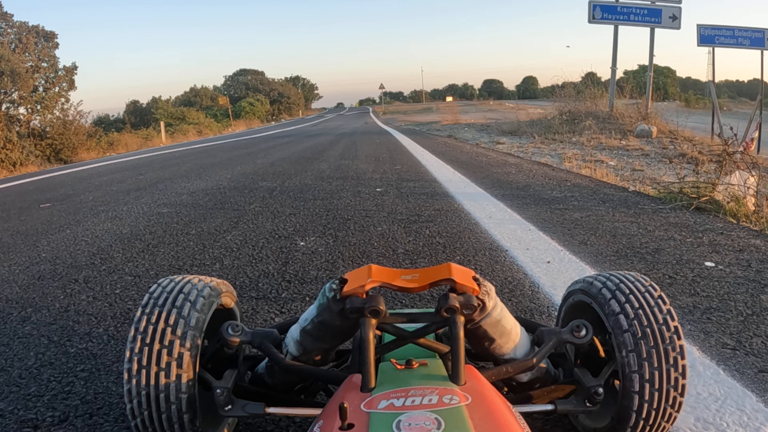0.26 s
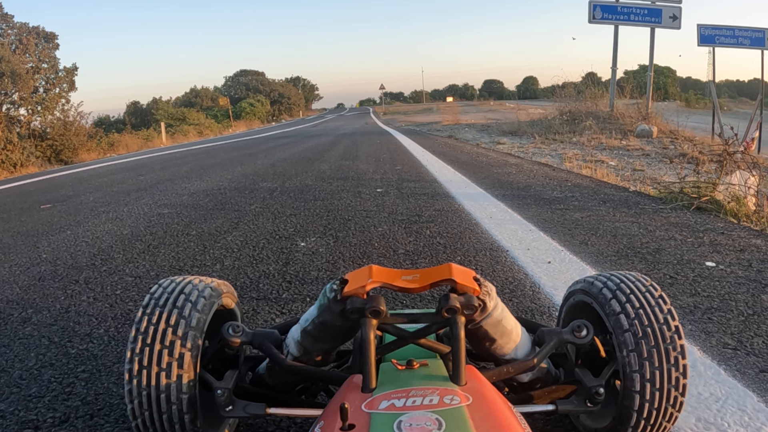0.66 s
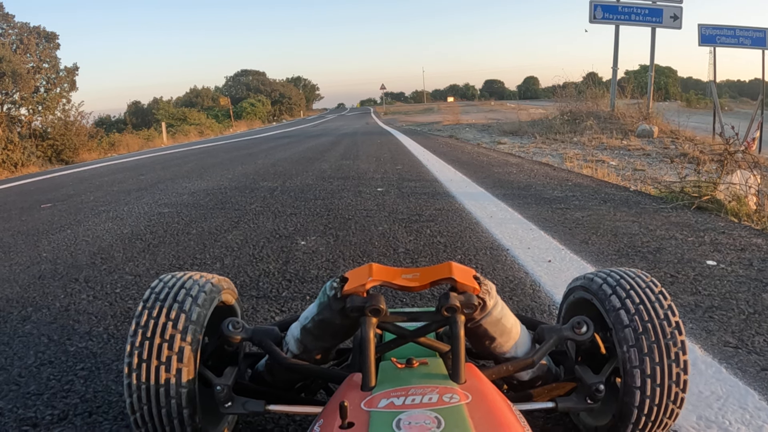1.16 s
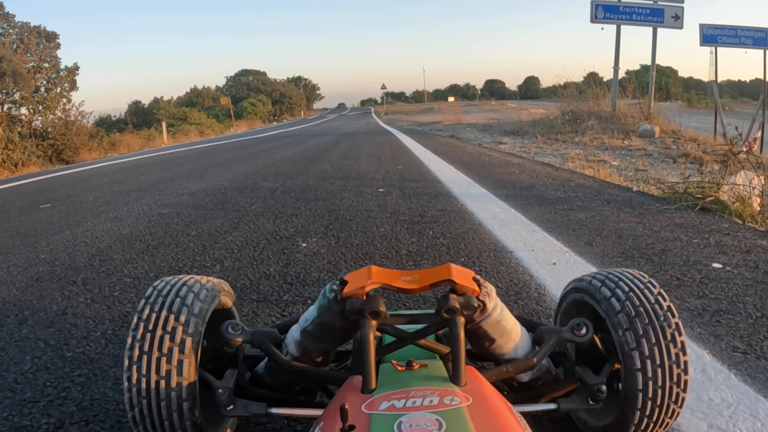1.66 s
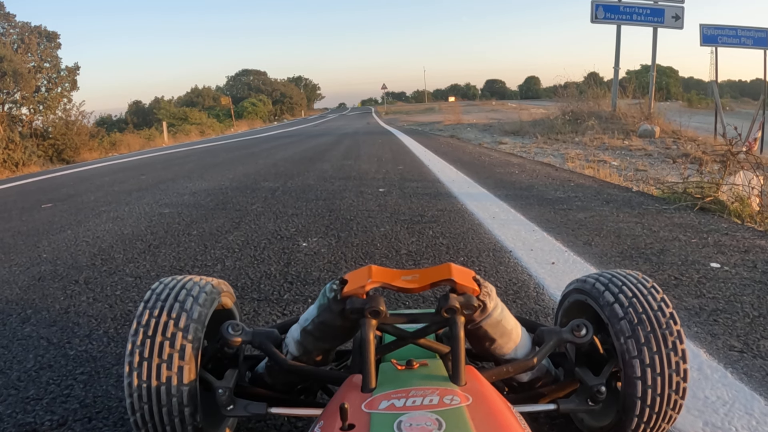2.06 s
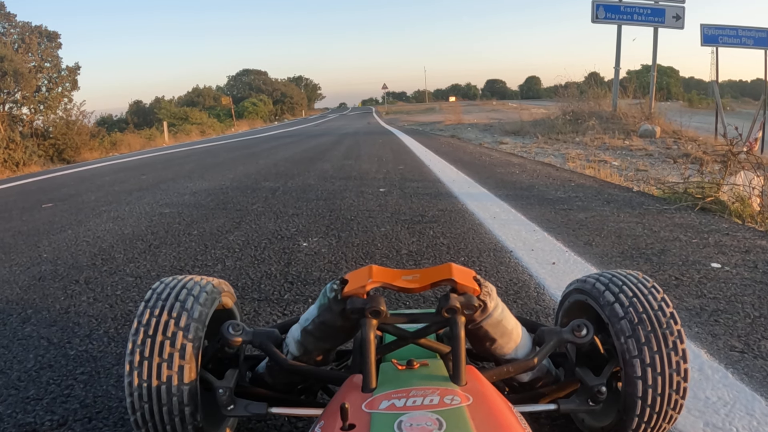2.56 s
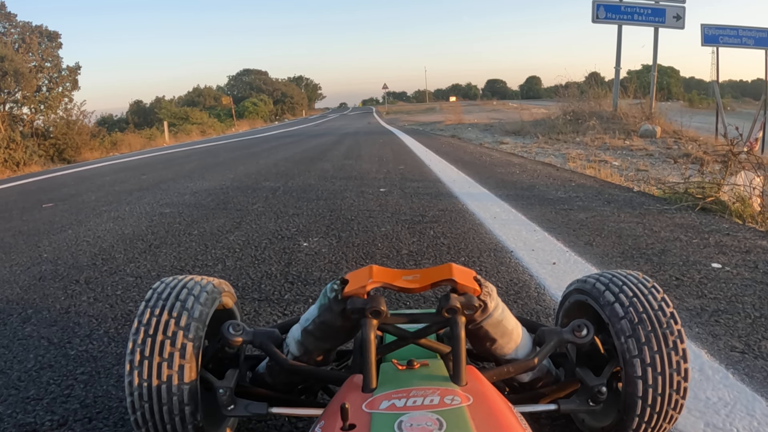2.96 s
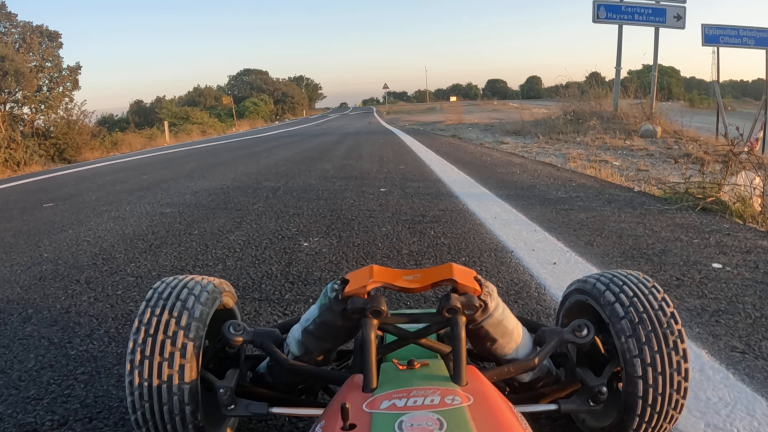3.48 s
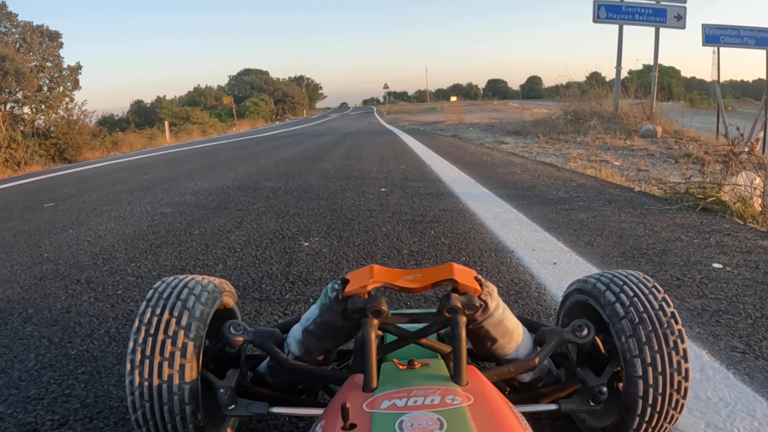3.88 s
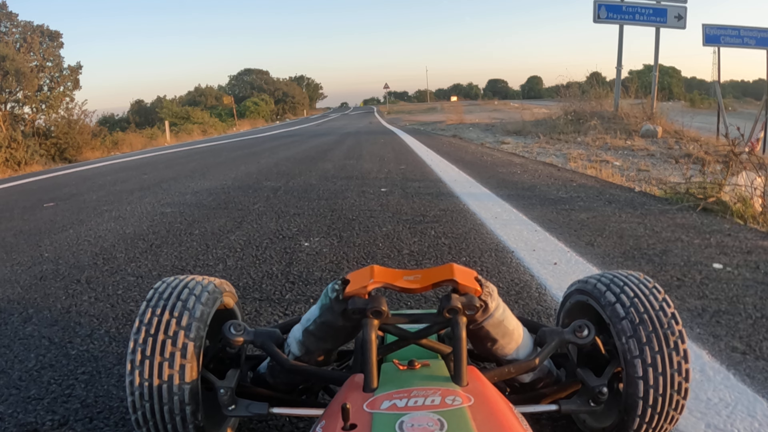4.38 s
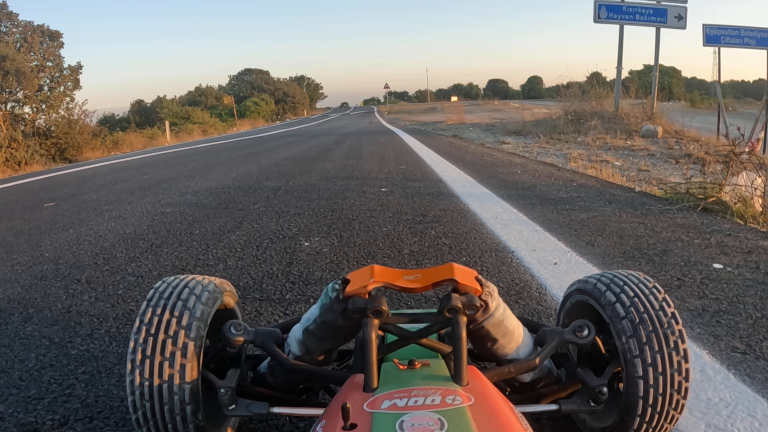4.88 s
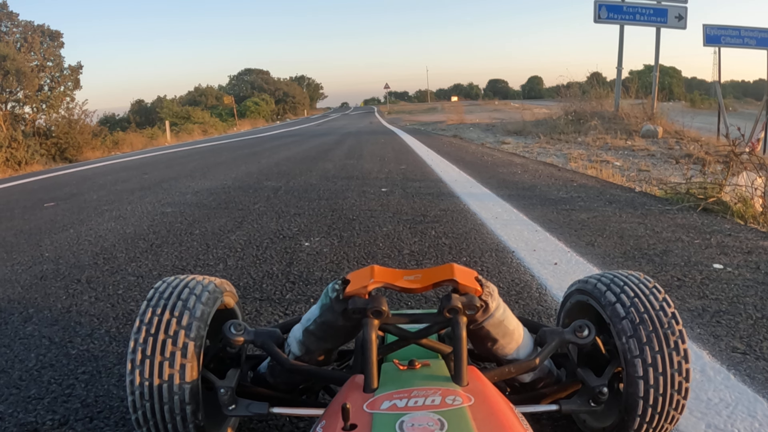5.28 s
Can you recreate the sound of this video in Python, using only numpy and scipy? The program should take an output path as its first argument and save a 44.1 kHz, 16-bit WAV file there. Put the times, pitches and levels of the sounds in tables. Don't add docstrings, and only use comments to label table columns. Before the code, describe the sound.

Close, body-mounted view of a small buggy starting outdoors: light irregular starter clicking, a few lurching thumps, then violent knocks and exhaust snaps as the engine catches. The pitch rises over about a second and a half into a low, lumpy putter with drumming panels and metallic chatter. A short rev jumps up and falls back, and another begins at the cut. No echo.

```python
import sys
import numpy as np
from scipy import signal
from scipy.fft import rfft, irfft, next_fast_len
from scipy.io import wavfile
from scipy.ndimage import uniform_filter1d, minimum_filter1d, map_coordinates

SR = 44100
rng = np.random.default_rng(int(sys.argv[2]) if len(sys.argv) > 2 else 0)


def generate_wav(sig):
    pcm = np.round(np.clip(np.atleast_2d(sig).T, -1, 1) * 32767).astype(np.int16)
    wavfile.write(sys.argv[1], SR, pcm)


def elevation(decibels):
    levels = np.asarray(decibels, float)
    return 10 ** (levels / 20)


N = 243917

# (t/s, speed/Hz, effort/dB)
SHAFT = [(1.45, 41.5, -2.5), (1.57, 44.5, -2.5), (1.77, 50.96, 4.5), (2.1, 55.18, 1), (2.99, 64.63, 2),
         (3.22, 66.87, 1.5), (3.979, 67.95, 4.5), (4.109, 66.5, 4), (4.33, 67.93, 3), (4.42, 78.28, 1.5),
         (4.531, 80.44, 1), (4.749, 70.7, 3), (4.951, 67.34, 2.5), (5.059, 66.55, 2), (5.278, 66.9, 3.5),
         (5.348, 67.63, 4), (5.44, 73.9, 3.5), (5.53, 80.8, 3.5)]
# (t/s, effort/dB, throttle 0-1)
CATCH = [
    (1.15, -50, .4),
    (1.215, -33.5, 0.2),
    (1.264, -20.5, 0),
    (1.308, -2, 0),
    (1.35, 0, 0.1),
    (1.414, 4, 0.3),
    (1.49, -9.5, 0.15),
    (1.54, -0.5, 0.3),
    (1.65, -4, 0.5),
    (1.71, -9.5, 0.62),
]
# (f/Hz, level/dB per Hz)
PANEL = [(10, -9.5), (30, -11.5), (60, -4.5), (120, -2.5), (200, -3), (300, -2.5), (530, -3.5), (620, -6.5),
         (730, -14), (900, -20.5), (1500, -48.5), (4000, -120)]
# (f/Hz, level/dB per Hz)
CHATTER = [(1180, -25.5), (2000, -3.5), (2530, -1), (3130, -6), (3500, -12.5), (3990, -13), (4340, -21.5),
           (5640, -34), (9550, -120)]
# (f/Hz, level/dB per Hz)
PUFF = [(3500, -39), (4600, -11), (5500, 0), (6500, -9), (7500, -11), (8300, -16.5), (10000, -26),
        (11000, -42.5), (14000, -68.5)]


def unit(x):
    return x / np.sqrt(np.mean(x ** 2) + 1e-20)


def curves(rows):
    s, *cols = np.transpose(rows)
    return [np.interp(np.arange(N) / SR, s, c) for c in cols]


def sounding(rows, fade_s=0.026):
    start, end = rows[0][0], rows[-1][0]
    return np.interp(np.arange(N) / SR, [start - fade_s, start, end, end + fade_s], [0, 1, 1, 0])


def wobble(rate_hz):
    return map_coordinates(rng.standard_normal(int(N * rate_hz / SR) + 4), [np.arange(N) * rate_hz / SR])


def coloured(x, spectrum):
    m = next_fast_len(N + SR // 2) * 2
    f, db = np.transpose(spectrum)
    gain = elevation(np.interp(np.log(np.fft.rfftfreq(m, 1 / SR) + 1), np.log(f), db))
    cep = irfft(np.log(gain + 1e-7), m)
    cep[1:m // 2] *= 2
    cep[m // 2 + 1:] = 0
    return unit(irfft(rfft(x, m) * np.exp(rfft(cep)), m)[:N])


def knocks(density_hz, spread_db, hiss):
    hit = rng.random(N) < density_hz / SR
    impacts = hit * rng.standard_normal(N) * elevation(spread_db * rng.standard_normal(N))
    return unit(impacts) + hiss * rng.standard_normal(N)


def mount(x):
    dead_hz, dead_width_hz = 1490, 260
    return signal.lfilter(*signal.iirnotch(dead_hz, dead_hz / dead_width_hz, SR), x)


def road():
    # (f/Hz, level/dB per Hz)
    air = [(15, -21.5), (25, -4.5), (100, -8), (300, -8), (500, -9), (664, -24), (880, -3), (1000, -3.5),
           (1150, -9), (1800, -25), (2800, -33.5), (3500, -30), (3800, -42.5), (4500, -39.5), (8000, -56),
           (11000, -120)]
    level_db = -49.5
    return elevation(level_db + 2.7 * wobble(22)) * coloured(rng.standard_normal(N), air)


def starter():
    # (t/s, peak/dB)
    teeth = [(0.016, -39.5), (.047, -47), (.086, -41), (0.167, -27), (0.174, -29), (0.186, -32),
             (.238, -45), (0.278, -30), (.308, -48), (0.331, -30), (0.363, -30), (0.38, -27.5),
             (0.407, -30), (0.455, -29.5), (0.524, -28), (0.551, -29), (0.569, -26.5), (0.582, -31),
             (.608, -28), (.645, -30), (0.667, -32.5), (0.722, -40), (0.734, -30), (0.745, -29.5),
             (0.771, -26), (.804, -28), (.952, -38.5), (0.99, -26), (1.008, -30), (1.061, -42),
             (1.137, -26.5)]
    # (t/s, peak/dB, metal edge/dB)
    blows = [(0.687, -17.5, -30), (0.835, -26, -34), (0.844, -18.5, -44), (0.856, -19, -45),
             (0.863, -44, -32.5), (0.912, -28.5, -32), (1.167, -32, -23), (1.179, -27, -22),
             (1.241, -16, -26), (1.273, -17, -28), (1.288, -6.5, -42), (1.2995, -9, -33), (1.307, -5, -41),
             (1.33, -9.5, -33), (1.3801, -10.5, -24), (1.446, -18, -22), (1.5, -14, -22), (3.695, -15, -31)]
    # (f/Hz, level/dB, share of ring length)
    plastic = [(677, -14, 1.9), (845, -9, 0.91), (1041, -4.5, .6), (1132, 4.5, 0.72), (1233, 3, 0.72),
               (1308, -1, 0.67), (1746, -19.5, 0.59)]
    # (f/Hz, level/dB, share of ring length)
    metal = [(2140, -5, .7), (2510, -8, 0.7), (2790, -13, 0.5), (3130, -9, 0.6), (3420, 3, 0.95),
             (3520, -3, .4), (4550, -19, 0.6), (5010, -26, .5), (5300, -25, .5)]
    tooth_ring_s, tooth_edge_db, blow_ring_s = 0.047, -22, 0.054
    slide_s, grit_share = 0.011, 0.09
    out, edge, t = np.zeros(N + SR), np.zeros(N + SR), np.arange(SR // 5) / SR
    ticks = [(s, db, tooth_ring_s, tooth_edge_db, grit_share) for s, db in teeth]
    ticks += [(s, db, blow_ring_s, edge_db, grit_share / 2) for s, db, edge_db in blows]
    luck = rng.standard_normal((len(ticks), len(plastic + metal)))
    grit = rng.standard_normal((len(ticks), round(slide_s * SR)))
    onset = (1 - np.exp(-t / 0.001)) ** 2
    for (s, db, ring_s, edge_db, rough), row, scrape in zip(ticks, luck, grit):
        modes = plastic + [(hz, level + edge_db - 2, 0.93 * share) for hz, level, share in metal]
        ring = sum(elevation(level + 1.2 * r - 60 * t / (ring_s * share)) * np.sin(2 * np.pi * hz * (1 + 0.004 * r) * t)
                   for (hz, level, share), r in zip(modes, row))
        scrape = scrape * rough * elevation(-60 * t[:len(scrape)] / 0.06)
        scrape[0] = 1
        hit = signal.fftconvolve(ring * onset, scrape)[:len(t)]
        i = round(s * SR)
        out[i:][:len(t)] += elevation(db) * hit / np.abs(hit).max()
        edge[i:][:len(t)] += elevation(db + edge_db - 8 - 60 * t / 0.068) * onset
    return out[:N] + edge[:N] * coloured(knocks(3400, spread_db=-4.0, hiss=0.92), CHATTER)


def thuds():
    # (t/s, peak/dB, length/s)
    shoves = [(0.685, -20.5, 0.068), (0.786, -24, 0.044), (0.831, -11, 0.043), (0.837, -13, 0.055),
              (0.853, -18, 0.11), (0.93, -30, 0.062), (0.989, -32, 0.082), (1.074, -46, 0.085),
              (1.169, -19, 0.034), (1.178, -27, 0.031), (1.228, -15, 0.021)]
    push, t = np.zeros(N + SR), np.arange(SR // 5) / SR
    for s, db, length_s in shoves:
        push[round(s * SR):][:len(t)] += elevation(db - 7.0 - 60 * t / length_s) * (1 - np.exp(-t / 0.0021))
    return push[:N] * coloured(knocks(690, spread_db=-5.0, hiss=0.86), PANEL)


def rocking():
    # (t/s, peak/dB, f/Hz)
    shoves = [(0.686, -23.5, 48.3), (0.831, -17.5, 52.5), (.88, -24.5, 44.3), (.94, -27, 50),
              (1.072, -25, 46), (1.12, -27, 54.7), (1.165, -26, 56.3), (1.208, -17, 54), (1.246, -22, 49.9),
              (1.315, -9, 36.4), (1.35, -18, 35.8), (1.408, -12.5, 38), (1.49, -24.5, 41)]
    rise_s, t60_s = 0.01, 0.31
    t, (start, _, hz) = np.arange(N) / SR, np.transpose(shoves)
    since = [np.maximum(t - s, 0) for s in start]
    size = sum(elevation(db - 60 * u / t60_s) * (1 - np.exp(-u / rise_s)) for u, (_, db, _) in zip(since, shoves))
    pace_hz = hz[np.searchsorted(start, t) - 1] + 3 * wobble(23)
    angle = 2 * np.pi * np.cumsum(pace_hz) / SR
    return 2 * size * (np.sin(angle) + 0.16 * np.cos(2 * angle))


def shell():
    # (t/s, peak/dB, f/Hz)
    notes = [(.73, -46, 210), (.785, -38.5, 330), (.845, -18, 640), (0.866, -25, 230), (.85, -26.5, 327),
             (.915, -45, 205), (1.082, -35, 234), (1.11, -43, 257), (1.144, -37, 252.3), (1.161, -31, 1810),
             (1.179, -23, 888), (1.245, -27, 2150), (1.432, -15.5, 322), (1.169, -25.5, 136),
             (1.176, -21.5, 289), (1.301, -13.5, 153), (1.183, -26.5, 657), (1.235, -22.5, 286),
             (1.242, -22.5, 1650), (1.331, -19, 110), (1.385, -12.5, 116), (1.419, -17, 99.6),
             (0.699, -31.5, 125), (0.921, -34, 142), (4.205, -11, 206.8), (4.38, -11, 189),
             (4.499, -11.5, 223), (4.586, -16, 151), (4.84, -23, 65.9), (.98, -52, 2850), (1.13, -50, 2900),
             (1.225, -40, 2310), (4.548, -21, 1600), (4.69, -15.5, 1497), (4.719, -21, 1570),
             (4.735, -20.5, 1560)]
    rise_s, t60_at_300hz_s, dulling_power = 0.0037, 0.086, 0.53
    since = [np.maximum(np.arange(N) / SR - s, 0) for s, _, _ in notes]
    drift = 0.91 * wobble(90)
    return sum(elevation(db + 5 - 60 * u / t60_at_300hz_s * (hz / 300) ** dulling_power) * (1 - np.exp(-u / rise_s))
               * np.sin(2 * np.pi * hz * u + drift) for u, (_, db, hz) in zip(since, notes))


def effort():
    # (t/s, dip/dB)
    stumbles = [
        (1.324, -8),
        (1.44, -9),
        (1.91, -0.5),
        (4.835, -6),
    ]
    # (opens t/s, shuts t/s)
    blips = [
        (4.361, 4.84),
        (5.411, 5.6),
    ]
    stumble_s, blip_edge_s, blip_fade_s, blip_opening = 0.007, 0.017, 0.23, 0.24
    t, idle_db, (catch_db, opening) = np.arange(N) / SR, curves(SHAFT)[1], curves(CATCH)
    dips_db = sum(db * np.exp(-((t - s) / stumble_s) ** 2) for s, db in stumbles)
    revving = sum(np.clip(np.minimum((t - opens) / blip_edge_s, (shuts - t) / blip_fade_s) + 0.5, 0, 1)
                  for opens, shuts in blips)
    return idle_db + catch_db + dips_db, opening + blip_opening * revving, revving


def crank():
    jitter_turns = 0.006 + 0.028 * effort()[2]
    return np.cumsum(curves(SHAFT)[0]) / SR + jitter_turns * wobble(25)


def firing():
    # (speed/Hz, shortfall of every second firing 0-1, kick/dB)
    by_speed = [(43, 0, -27), (50, 0.05, -25.5), (62.6, 0.05, -22.5), (66.45, 0.51, -25.5),
                (69.8, 0.4, -32.5), (73.4, 0.3, -28)]
    hz, skip, kick_db = np.transpose(by_speed)
    speed = curves(SHAFT)[0]
    return np.clip(np.interp(speed, hz, skip), 0, 1), np.interp(speed, hz, kick_db)


def chassis(turns):
    # (f/Hz, level/dB per Hz)
    rattling = [(410, -21), (730, -9.5), (861, 3), (952, -2.5), (1050, 2), (1114, 6), (1180, 1), (1300, 0),
                (1470, -13), (1760, -6.5), (2100, -26.5), (2730, -54), (4620, -120)]
    # (f/Hz, level/dB per Hz)
    skirt = [(100, -10.5), (300, 7.5), (900, 1.5), (1700, -14.5), (2800, -21), (3500, -29), (4500, -40),
             (7200, -50.5), (9500, -89.5)]
    # (f/Hz, level/dB per Hz)
    buzz = [(400, -48), (680, -11.5), (820, -3.5), (950, -2.5), (1300, -24), (3000, -120)]
    (effort_db, throttle, revving), skip, angle = effort(), firing()[0], 2 * np.pi * turns
    shared = 0.34 * wobble(14) + 0.8 * wobble(40)
    beat = 0.23 * np.cos(angle - 0.6) + 0.13 * skip * np.cos(angle / 2 - 3.5)
    lope = 1.5 * np.cos(angle - 2.2) + 3 * skip * np.cos(angle / 2 - 3)
    narrow = 6.6
    every_turn = np.exp(narrow * (np.cos(angle) - 1))
    second_turn = np.exp(narrow * (np.cos(angle / 2 - 4.3) - 1))
    port = (7.5 + 3 * wobble(23)) * ((1 - skip) * every_turn + skip * second_turn)
    high = np.clip((curves(SHAFT)[0] - 66.8) / 6.1, 0, 1)
    bunch = 5 * high * np.cos(2 * angle + 1.2)

    impacts = knocks(3400, spread_db=1.5, hiss=0.86)
    drumming = 0.41 * impacts + knocks(1800, spread_db=1.5, hiss=0.79)
    drum = coloured(elevation(beat + 0.32 * shared) * drumming, PANEL)
    rattle = coloured(elevation(lope + 0.69 * shared) * impacts, rattling)
    chatter_db = bunch + 0.88 * lope + 0.17 * port * revving + 1.3 * shared
    chatter = coloured(elevation(chatter_db) * (1.0 * impacts + rng.standard_normal(N)), CHATTER)
    hiss_db = bunch / 2 + 3.5 * revving + 0.76 * lope + port + 1.1 * shared
    hiss = coloured(elevation(hiss_db) * (impacts + 4.1 * rng.standard_normal(N)), PUFF)

    even_calm_db = -0.5 * (0.5 - 2 * skip)
    loose = elevation(-15 + effort_db + even_calm_db) * drum
    loose += elevation(-22.5 + 0.64 * effort_db + 4 * throttle) * rattle
    loose += elevation(-37.5 + 0.83 * np.minimum(effort_db, -4.5) + 5 * throttle) * chatter
    loose += elevation(-70 + 1.35 * effort_db + 17 * throttle) * hiss
    slaps = np.diff(np.floor(2 * turns + 0.33), prepend=0) * elevation(3 * rng.standard_normal(N))
    loose += high * elevation(-27) * coloured(slaps, skirt)
    loose += high * elevation(-30.5 + 2.9 * wobble(20)) * coloured(impacts, buzz)
    return sounding([CATCH[0], SHAFT[-1]], fade_s=0.091) * loose


def backfires():
    # (t/s, peak/dB)
    cracks = [(1.2422, -28.5), (1.2725, -36), (1.331, -23.5), (1.3455, -29), (1.354, -20.5), (1.369, -23),
              (1.3805, -17), (1.3964, -25), (1.415, -30), (1.422, -24), (1.4325, -24.5), (1.447, -20),
              (1.4772, -29), (1.5187, -29.5), (1.5434, -30), (1.575, -34.5), (1.5963, -30.5), (1.622, -22),
              (1.643, -26), (1.666, -28), (1.863, -25.5), (1.876, -33), (2.1252, -25.5), (1.4902, -35),
              (4.3936, -32), (4.4202, -30), (4.5823, -28), (4.608, -31.5), (4.6278, -35), (4.701, -29),
              (4.8136, -30)]
    # (f/Hz, level/dB per Hz)
    snap = [(400, -30), (1200, 3.5), (2500, 1), (3400, -6.5), (4200, -17), (5500, -27.5), (8000, -39),
            (10000, -66.5), (16000, -100)]
    # (t/s, peak/dB)
    spikes = [(1.2923, -68), (1.3103, -63), (1.3313, -64), (1.338, -57), (1.3573, -57.5), (1.3647, -52),
              (1.3707, -54.5), (1.3756, -46.5), (1.3815, -49.5), (1.4235, -53.5)]
    # (f/Hz, level/dB per Hz)
    spike_spectrum = [(3000, -40), (6000, -4.5), (9000, 0), (14500, -1.5), (15500, -30.5), (17000, -100)]
    # (t/s, level/dB)
    flare = [
        (1.32, -90),
        (1.345, -67),
        (1.37, -59),
        (1.42, -56),
        (1.45, -63),
        (1.47, -89),
    ]
    burst, tick, t = np.zeros(N + SR), np.zeros(N + SR), np.arange(SR // 20) / SR
    for s, db in cracks:
        burst[round(s * SR):][:len(t)] += elevation(db - 1 - 60 * t / 0.028) * (1 - np.exp(-t / 0.0003))
    for s, db in spikes:
        tick[round(s * SR):][:len(t)] += elevation(db - 7 - 60 * t / 0.008)
    rush_db = curves(flare)[0] + 2 * wobble(120)
    rush = sounding(flare) * elevation(rush_db) * coloured(rng.standard_normal(N), PUFF)
    snaps = burst[:N] * coloured(rng.standard_normal(N), snap)
    return snaps + rush + tick[:N] * coloured(rng.standard_normal(N), spike_spectrum)


def engine(turns):
    # (order, level/dB)
    wholes = [(1, -0.17), (2, 1.5), (3, -7), (4, -7)]
    # (order, level/dB)
    halves = [(.5, 0.5), (1.5, 0.5), (2.5, 2), (3.5, -3), (4.5, -4.5), (5.5, 3.5)]
    # (f/Hz, width/Hz, level/dB)
    resonances = [(22, 5.9, -21), (57.7, 24, -17.5), (125, 12, -21), (152.6, 11, -18.5), (187.2, 9.6, -19),
                  (218.6, 11.2, -19.5), (302, 62, -24.5)]
    # (f/Hz, level/dB)
    thump = [(40, -31), (100, 7), (200, 2), (310, -2.5), (400, 10), (540, 8.5), (620, 2.5), (730, -20),
             (1100, -3.5), (1500, -24.5), (3000, -55), (6000, -120)]
    speed, angle, (skip, kick_db) = curves(SHAFT)[0], 2 * np.pi * turns, firing()

    def frame(f):
        return np.sqrt(sum(elevation(2 * db) / (1 + (2 * (f - hz) / width) ** 2) for hz, width, db in resonances))

    def line(order, db, lag):
        level = elevation(db + 0.34 * order * wobble(16))
        return level * frame(order * speed) * np.cos(order * angle - lag)

    def orders(rows, lags_rad):
        return sum(line(order, db, lag) for (order, db), lag in zip(rows, lags_rad))

    uneven = 0.017 + skip + 0.24 * effort()[2]
    shake = orders(wholes, [3.06, 4.94, 4.02, 3.58])
    shake += uneven * orders(halves, [4.9, 2.3, 2.7, 4.5, 5.37, 1.3])

    fired = np.flatnonzero(np.diff(np.floor(turns)) > 0)
    luck = rng.standard_normal((500, 2))[:len(fired)]
    weak = 0.64 * skip[fired] * (np.floor(turns[fired]) % 2)
    late_s = (0.00015 + 0.0007 * skip[fired]) * luck[:, 0]
    at = np.clip(fired + (late_s * SR).astype(int), 0, N - 1)
    kicks = -np.bincount(at, np.clip(1 - weak, 0, 1) * elevation(1.0 * luck[:, 1]), N)

    settling = elevation(133 * np.minimum(np.arange(N) / SR - 1.64, 0))
    motion = np.sqrt(2) * shake + elevation(kick_db) * coloured(kicks, thump)
    return sounding(SHAFT, fade_s=0.05) * settling * motion


def scene():
    turns = crank()
    body = thuds() + rocking() + shell()
    return (mount(road() + starter()) + body + chassis(turns) + backfires() + engine(turns))[None]


def band_limit(x):
    return signal.sosfilt(signal.butter(12, 15100, fs=SR, output="sos"), x)


def record(dry):
    need = np.minimum(1, 0.76 / (np.abs(dry) + 1e-9))
    gain = uniform_filter1d(minimum_filter1d(need, size=441), size=441)
    return band_limit(dry * gain)


dry = scene()
out = record(dry)
generate_wav(out)
```